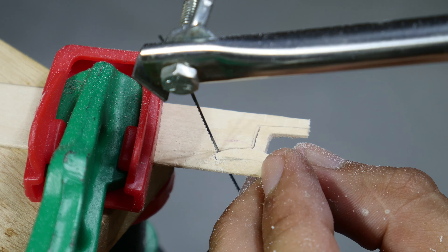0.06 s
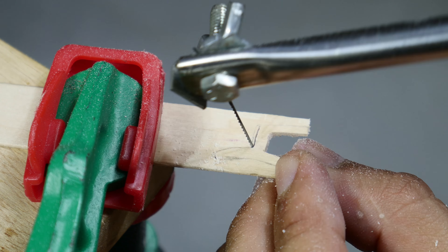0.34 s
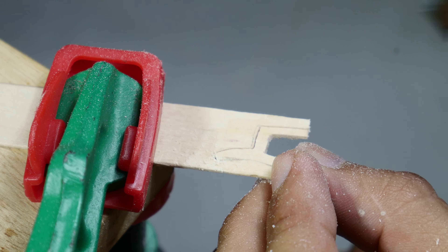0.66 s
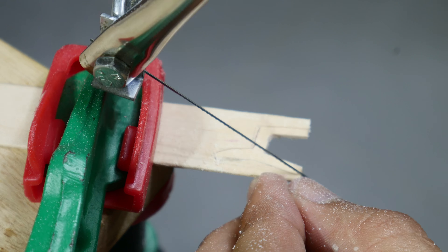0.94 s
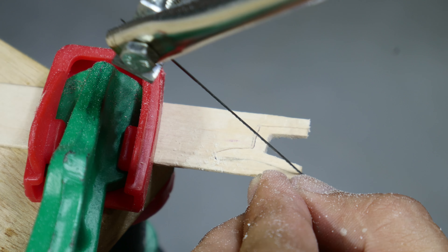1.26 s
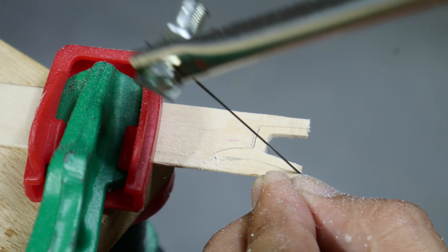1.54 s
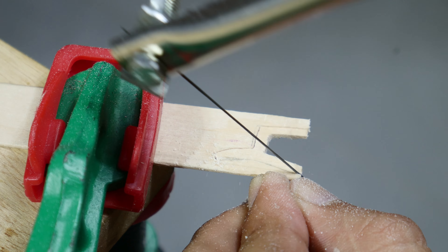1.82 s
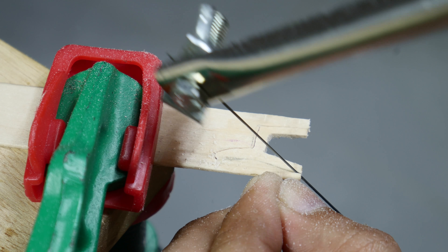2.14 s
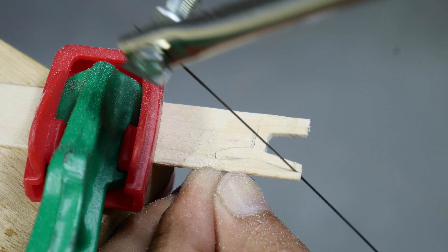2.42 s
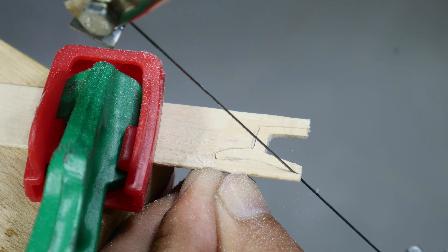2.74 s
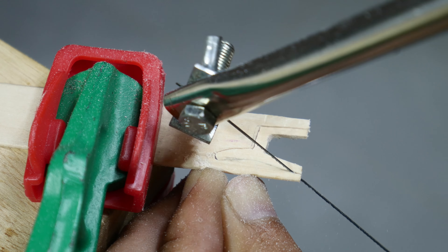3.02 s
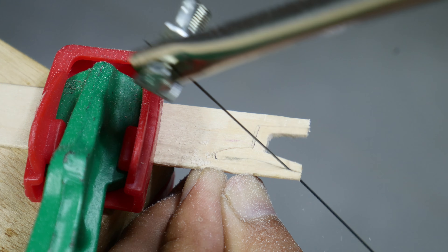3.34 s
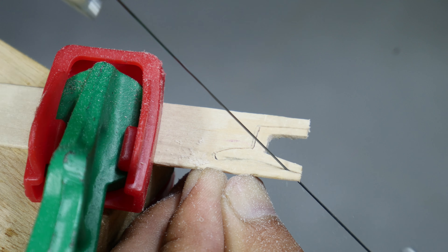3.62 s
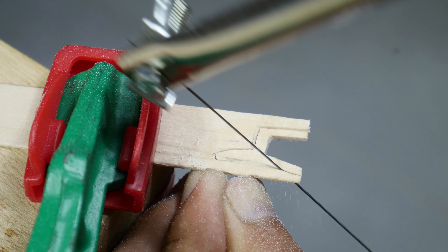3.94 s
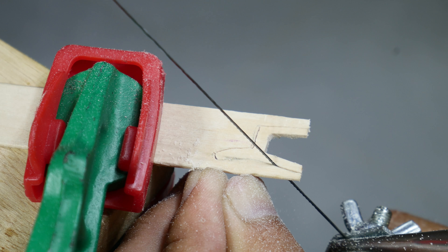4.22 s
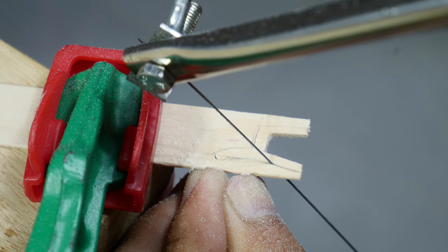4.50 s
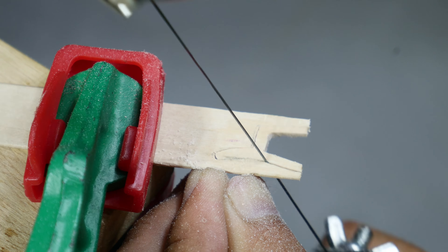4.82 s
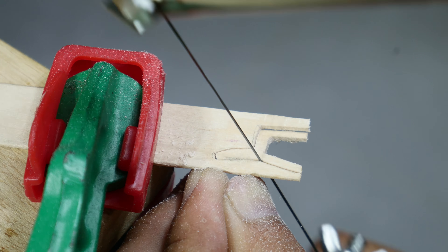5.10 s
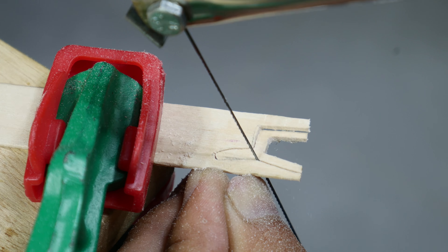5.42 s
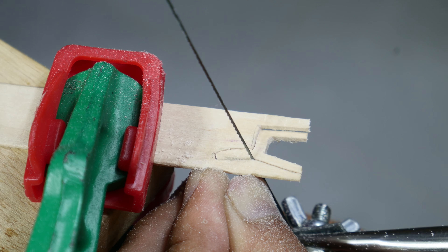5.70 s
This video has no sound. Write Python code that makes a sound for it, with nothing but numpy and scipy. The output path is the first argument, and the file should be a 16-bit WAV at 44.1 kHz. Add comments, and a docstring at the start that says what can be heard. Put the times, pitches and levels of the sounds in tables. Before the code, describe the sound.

A thin fret saw blade brushes a clamped wooden stick with a few brief scrapes and tiny, high metallic pings. After a short pause it starts sawing in quick, short strokes, a bright rasp that grows louder and keeps going. Some return strokes squeal, and the clamp and bench shudder faintly underneath. The sound is close, in a small, quiet room.

```python
"""A fret saw cutting a thin stick

The stick is clamped to a bench, close by in a small room. The blade scrapes and pings as it is worked
out of its old kerf (the slot a saw cuts), then saws from the edge in quick, short strokes. In each
stroke the teeth speed up and slow down, plucking stick and blade so that both ring. Some return
strokes squeal, the clamp shudders, and near the end the saw turns."""
import sys
import numpy as np
from scipy import signal
from scipy.fft import rfft, irfft, next_fast_len
from scipy.io import wavfile
from scipy.ndimage import uniform_filter1d, map_coordinates

SR = 44100
rng = np.random.default_rng(int(sys.argv[2]) if len(sys.argv) > 2 else 0)


def wav_record(signal):
    """Record a signal, one row per channel, as 16-bit PCM in the file named by sys.argv[1]."""
    frames = np.transpose(np.atleast_2d(signal))
    bounded = np.clip(frames, -1, 1)
    # unit amplitude maps onto the largest positive 16-bit level
    quanta = np.round(bounded * 32767).astype(np.int16)
    wavfile.write(sys.argv[1], SR, quanta)


N = 258426

# Background noise of the room: pitch_hz, level_db
AIR_COLOUR = [(25, -46), (165, -30), (240, -4.5), (360, -16.5), (450, -7.5), (2500, -13), (15800, -35)]
# Faint tones in the room: pitch_hz, level_db
HUM_TONES = [(366, -71.5), (2589, -86)]
# Low shudder of clamp and bench: time_s, level_db
SHUDDER_LEVELS = [(0, -54), (.09, -75), (2.0, -76.5), (2.15, -58.5), (2.32, -61.5), (2.55, -75), (4.6, -68),
                  (5.05, -53.5), (5.25, -64.5), (5.86, -59)]
# Colour of that shudder: pitch_hz, level_db
SHUDDER_COLOUR = [(20, -14.5), (90, -27), (170, -28), (290, -10.5), (362, 3.5), (410, -10.5), (650, -13),
                  (1100, -24.5)]
# The saw's three bands (low knock, middle rasp, high hiss): low_hz, high_hz
BANDS = [(200, 1800), (1800, 5900), (5900, 17000)]
# The loose blade brushes the wood: start_s, length_s, rasp_db, hiss_over_rasp_db, knock_over_rasp_db
SCRAPES = [(0.009, 0.02, -46, 1, -15), (0.031, 0.023, -58, -2, -10), (0.188, 0.003, -60, 9, -20),
           (0.2049, 0.0095, -39, 0.5, -18.5), (0.38, 0.012, -38.5, -6.5, -9), (0.468, 0.035, -75, -23, 9),
           (0.551, 0.038, -56.5, -7, -16), (0.611, 0.018, -43, 5, -18.5), (0.631, 0.014, -51.5, 0, -8),
           (0.654, 0.02, -42, -6, -11.5), (0.707, 0.0096, -52, 11, -26), (0.714, 0.0033, -40.5, 2.5, -26),
           (1.056, 0.031, -68.5, -5, 1), (1.259, 0.006, -57.5, -10, -9), (1.275, 0.013, -55.5, -8, -5)]
# Colour of those scrapes: pitch_hz, level_db
SCRAPE_COLOUR = [(180, -71), (300, -28), (1010, -20), (1360, -15), (1680, -27), (2590, 15), (3610, 4),
                 (3920, 14), (5200, 7), (5940, -12.5), (7870, -12.5), (8840, -14.5), (10600, -24),
                 (13200, -9), (15800, -18)]
# The blade springs free: start_s, level_db, pitch_hz
PINGS = [(0.206, -58, 8100), (0.618, -50, 7628), (0.714, -57, 11030)]
# The tones in one ping: pitch_ratio, level_db, fade_s (time to fall 60 dB)
PING_TONES = [(.435, -3, 0.048), (0.931, -3, 0.21), (0.997, 13.5, 0.09), (1.38, -21, 0.14),
              (1.997, -18, 0.12)]
# Runs of even sawing: start_s, cycles (cut and return), limp_db (cuts are stronger and weaker in turn)
RUNS = [(1.345, 1, 0.5), (1.388, 2, -1), (1.531, 3, -1), (1.723, 10, 1), (2.349, 4, 2), (2.596, 4, 0.5),
        (2.839, 5, -0.5), (3.155, 8, 1.8), (3.646, 6, 1.7), (4.016, 11, 0), (4.69, 3, 1.5), (4.867, 2, 1),
        (5.001, 3, 0.5), (5.223, 3, 0), (5.426, 4, 1.2), (5.675, 3, 0)]
# How hard the teeth press in on the cutting strokes: time_s, rasp_db
CUT_PRESSURE = [(1.34, -61.5), (1.39, -39.5), (1.85, -42), (1.91, -49), (2.1, -29.5), (2.23, -41.5),
                (2.35, -31.5), (2.53, -31.5), (2.66, -26.9), (2.84, -33.5), (2.97, -29.5), (4.2, -30.5),
                (4.32, -36), (4.69, -29), (5.151, -28), (5.219, -35), (5.36, -25), (5.799, -28)]
# How hard they drag on the way back, more as the kerf binds: time_s, rasp_db
RETURN_PRESSURE = [(1.37, -55.5), (1.43, -40), (1.57, -36.5), (1.95, -45.5), (2.011, -34), (2.26, -45.5),
                   (2.32, -35), (2.44, -37), (2.63, -33.5), (2.75, -40), (4.23, -30.5), (4.35, -35),
                   (4.48, -27.5), (4.54, -35.5), (5.19, -27), (5.26, -36), (5.33, -29.5), (5.84, -28)]
# Colour of the cutting strokes: time_s, hiss_over_rasp_db, knock_over_rasp_db
CUT_TONE = [(1.34, -1, -1.5), (1.53, -2.5, -21.5), (1.73, -10, -11.6), (2.29, -3, -12.5), (3.28, -5.5, -15),
            (3.95, -6, -17.5), (5.08, -8, -18.5), (5.22, -10, -23.5), (5.8, -17, -24)]
# Colour of the return strokes: time_s, hiss_over_rasp_db, knock_over_rasp_db
RETURN_TONE = [(1.37, -10.5, -6.5), (1.5, -10.7, -16), (2.57, -8, -25.5), (2.75, -6.5, -19.5),
               (4.29, -12.5, -22.5), (5.04, -11.5, -9.5), (5.19, -18, -29.5), (5.33, -17, -18),
               (5.84, -16.5, -12.5)]
# The teeth snag (+) or skid (-): time_s, extra_rasp_db, extra_hiss_db, extra_knock_db
SNAGS = [(1.4, 0, 0, 2), (1.44, 2.5, 7, 7), (1.93, -4, 8, 1), (2.06, 0.5, -3.5, 3), (2.23, -2, -2, -12),
         (2.49, 1.5, 1, -3.5), (2.55, 0, -0.5, -5), (2.61, 0.5, 3.5, -2.5), (2.98, 3, -0.5, 1),
         (3.17, -0.5, 5.5, -1), (3.36, 1, 3.5, 1.5), (3.42, 2.5, 0.5, -1.5), (3.91, 1.5, -0.5, 1.5),
         (4.67, 1, -2.5, 5), (5.05, 3, 3.5, -3), (5.24, 0, 0, -6), (5.34, 0.5, 0, 3)]
# Where stick and blade ring, for each seat of the blade: pitch_hz, width_hz, edge_db, deep_db, turned_db
RESONANCES = [(793, 147, -7, -18.5, -15), (966, 45, -2, -11, -18.5), (1189, 90, -2.5, -8.5, -19),
              (1367.3, 25.4, -4, -1, -16), (2070, 272, -9.5, -15, -16.5), (2550, 77, 1, -1, -9),
              (2798, 190, -10.5, -1.5, -14), (3215, 274, -3, -3.5, -9), (3886, 61, 4, 0, 0),
              (4050, 114, -3.5, -6.5, 4), (4665, 213, -1.5, -3.5, -10), (4966, 185, -6, -30.5, -7.5),
              (5324, 167, -8, -14, -11.5), (6530, 335, -14.5, -15, -22), (7990, 440, -17.5, -14, -23),
              (8957, 184, -12, -4, -21), (10050, 720, -21.5, -14, -25.5), (11870, 520, -10.5, -8, -23),
              (13170, 330, -7.5, -2, -19), (14400, 670, -17, -7.5, -40), (14600, 500, -22, -25.5, -30)]
# Rough rate of passing teeth in mid-stroke, for each seat: edge_hz, deep_hz, turned_hz
TOOTH_HZ = [1464, 1507, 1387]
# When the blade changes its seat in the wood: sinks_in_s, turns_s
SEAT_CHANGES = [2.284, 5.114]
# The squeal of the return strokes: time_s, level_over_rasp_db, pitch_hz
SQUEAL_CURVE = [(1.499, -30, 4310), (1.8, 5, 4230), (2.302, -36, 4660), (4.18, -3, 5250),
                (4.401, -15, 5034), (4.85, 3, 5200), (5.25, 1, 4410)]
# The room's echo: pitch_hz, fade_s (time to fall 60 dB)
ECHO_FADES = [(200, 0.58), (2500, 0.092), (12000, 0.17)]

TWIST_START_S, LAST_STOP_S = 4.65, 5.868  # the hand starts to twist the saw; the sawing ends
CUT_SHARE = .52  # part of a cycle taken by the cutting stroke
CUT_PEAK, RETURN_PEAK, PUSH_WIDTH = 0.49, 0.26, 0.41  # the hand's push, in parts of a stroke
STUTTER_DB, RETURN_STUTTER_DB = 2.2, 1.0  # teeth catch in the grain; extra on the way back
SLACKENING_DB, TICK_DB = 7, 13.5  # a scrape's fall in level; its first tooth landing, over the scrape
AIR_DB, SHAKE_DB, ECHO_DB = -75, -24.5, -15  # room noise; shudder over knock; echo over saw
TOP_HZ = 15950


def amp(db):
    """Turn decibels into a gain."""
    return 10 ** (np.asarray(db) / 20)


def unit(x):
    """Scale a signal to an average power of 1."""
    return x / np.sqrt(np.mean(x ** 2) + 1e-20)


def at_pitch(points, hz):
    """Read between (pitch_hz, value) points on a log pitch scale."""
    pitches, values = np.transpose(points)
    return np.interp(np.log(hz + 1), np.log(pitches + 1), values)


def at_time(curve, time_s):
    """Read each value column of a (time_s, values...) table at the given time."""
    times, *columns = np.transpose(curve)
    return [np.interp(time_s, times, column) for column in columns]


def wobble(rate_hz):
    """A smooth curve through rate_hz random points a second."""
    points = rng.standard_normal(int(N * rate_hz / SR) + 4)
    return map_coordinates(points, [np.arange(N) * rate_hz / SR])


def filtered(x, response):
    """Scale each frequency in x by response(hz)."""
    size = next_fast_len(N + SR // 2)
    return irfft(rfft(x, size) * response(np.fft.rfftfreq(size, 1 / SR)), size)[:N]


def noise(colour):
    """Steady noise with a (pitch_hz, level_db) colour."""
    return unit(filtered(rng.standard_normal(N), lambda hz: amp(at_pitch(colour, hz))))


def ring(force, response, band, size=8192):
    """A pushed object rings on after the push; this gives one band of that sound."""
    hz = np.fft.rfftfreq(size, 1 / SR) + 1
    low_hz, high_hz = band
    gain = response(hz) / np.sqrt((1 + (low_hz / hz) ** 20) * (1 + (hz / high_hz) ** 20))
    # fold the filter in time so that nothing rings before the push
    cepstrum = irfft(np.log(gain / gain.max() + 1e-4))
    cepstrum[1:size // 2] *= 2
    cepstrum[size // 2 + 1:] = 0
    one_tap = irfft(np.exp(rfft(cepstrum)))
    return signal.oaconvolve(force, one_tap / np.linalg.norm(one_tap))[:N]


def room_air():
    """Quiet room noise with a faint hum that wavers."""
    t = np.arange(N) / SR
    hum = sum(amp(db + 2.9 * wobble(7.9)) * np.sin(2 * np.pi * hz * t + 0.66 * wobble(18))
              for hz, db in HUM_TONES)
    return amp(AIR_DB) * noise(AIR_COLOUR) + hum


def clamp_shudder(strokes, stroke_no, bite):
    """Clamp and bench shudder at their own low pitch; hard strokes shake them more."""
    base_db, = at_time(SHUDDER_LEVELS, np.arange(N) / SR)
    _, rasp_db, _, knock_db, _ = strokes.T
    shake = bite * amp((rasp_db + knock_db)[stroke_no] + SHAKE_DB)
    return (amp(base_db) * (1 + .5 * bite) + shake) * noise(SHUDDER_COLOUR)


def tearing_fibres(rate_hz, spread_db=5.0):
    """Wood fibres tear in tiny, uneven bursts of noise."""
    return unit(rng.standard_normal(N) * amp(spread_db * wobble(rate_hz)))


def blade_scrapes():
    """A few teeth land on the wood with a tick, then scrape as the pressure eases."""
    t = np.arange(N) / SR
    fibres = tearing_fibres(rate_hz=850)
    forces = np.zeros((len(BANDS), N))
    for start_s, length_s, rasp_db, hiss_db, knock_db in SCRAPES:
        touching = (t >= start_s) & (t < start_s + length_s)
        easing_db = SLACKENING_DB * (.4 - (t[touching] - start_s) / length_s)
        pressure = amp(rasp_db + easing_db + np.array([[knock_db], [0], [hiss_db]]))
        forces[:, touching] = pressure * unit(fibres[touching])
        forces[:, np.argmax(touching)] += pressure[:, 0] * amp(TICK_DB)
    colour = lambda hz: amp(at_pitch(SCRAPE_COLOUR, hz))
    return sum(ring(force, colour, band) for force, band in zip(forces, BANDS))


def blade_pings():
    """The tight blade springs free and rings; its pitch depends on where the wood last held it."""
    out, t = np.zeros(N), np.arange(SR // 2) / SR
    for start_s, ping_db, hz in PINGS:
        for ratio, tone_db, fade_s in PING_TONES:
            if hz * ratio < TOP_HZ:
                fade = amp(ping_db + tone_db - 60 * t / fade_s)
                out[round(start_s * SR):][:len(t)] += fade * np.sin(2 * np.pi * hz * ratio * t)
    return out


def plan_strokes():
    """Cuts and returns in turn: start_s, rasp_db, hiss_over_rasp_db, knock_over_rasp_db, push_peak."""
    ends = [run[0] for run in RUNS[1:]] + [LAST_STOP_S]
    rows = []
    for (first_s, cycles, limp_db), end_s in zip(RUNS, ends):
        cycle_s = (end_s - first_s) / round(cycles)
        for k in range(round(cycles)):
            cut = first_s + k * cycle_s, CUT_PRESSURE, CUT_TONE, CUT_PEAK, limp_db * (-1) ** k
            back = first_s + (k + CUT_SHARE) * cycle_s, RETURN_PRESSURE, RETURN_TONE, RETURN_PEAK, 0
            for start_s, pressure, tone, push_peak, accent_db in cut, back:
                rasp_db, = at_time(pressure, start_s)
                hiss_db, knock_db = at_time(tone, start_s)
                rows.append((start_s, rasp_db + accent_db, hiss_db, knock_db + accent_db, push_peak))
    strokes = np.array(rows)
    for time_s, *extra_db in SNAGS:
        strokes[np.searchsorted(strokes[:, 0], time_s) - 1, 1:4] += extra_db
    column_spread = [0, .5, .6, 1.9, .05]  # no two strokes are alike
    return strokes + column_spread * rng.standard_normal(strokes.shape)


def blade_motion(strokes):
    """For each sample: the stroke under way, the blade's speed (0-1) and how hard the teeth bite."""
    t = np.arange(N) / SR
    turns_s = np.append(strokes[:, 0], LAST_STOP_S)
    started = t > turns_s[0]
    strokes_done = np.interp(t, turns_s, np.arange(len(turns_s)))
    stroke_no = np.minimum(strokes_done.astype(int), len(strokes) - 1)
    progress = strokes_done - stroke_no
    speed = np.abs(np.sin(np.pi * progress))  # the blade stands still at each end
    push_peak = strokes[stroke_no, 4]
    push = np.exp(-((progress - push_peak) / PUSH_WIDTH) ** 2)
    bite = speed ** 0.55 * (push + 0.24) + 0.013  # a little bite is left without push or speed
    # early in a stroke the teeth stick for a moment, then break free at once
    bite *= np.where(progress > .45 * push_peak, 1, 0.55) * started
    bite *= amp((STUTTER_DB + RETURN_STUTTER_DB * (stroke_no % 2)) * wobble(230))
    stroke_power = np.bincount(stroke_no, bite ** 2) / np.bincount(stroke_no, started)
    return stroke_no, speed, bite / np.sqrt(stroke_power[stroke_no])


def blade_seats(start_s):
    """How the blade sits in each stroke: 0 on an edge, 1 deep in the kerf, 2 turned."""
    seats = np.searchsorted(SEAT_CHANGES, start_s + .01)
    returning = np.arange(len(start_s)) % 2 == 1
    # once the saw twists, the light return strokes ride up on the edge of the kerf
    return np.where(returning & (start_s > TWIST_START_S) & (seats == 1), 0, seats)


def stick_and_blade(hz, seat):
    """How strongly stick and blade ring at each pitch, for one seat of the blade."""
    resonances = np.array(RESONANCES)
    pitch_hz, width_hz = resonances[:, :1], resonances[:, 1:2]
    peaks = (1 + ((hz - pitch_hz) / width_hz) ** 2) ** -2
    return np.sqrt(amp(resonances[:, 2 + seat]) ** 2 @ peaks)


def tooth_pulses(rate_hz, timing_spread=.02, spread_db=1.4, count=16000):
    """One pulse for each tooth that meets the wood, a little uneven in time and size."""
    chance = rng.standard_normal((count, 2))
    teeth_passed = np.cumsum(rate_hz) / SR
    hits = np.interp(np.arange(count) + timing_spread * chance[:, 0], teeth_passed, np.arange(N))
    inside = (hits > 8) & (hits < N - 9)
    hits, sizes = hits[inside, None], amp(spread_db * chance[inside, 1:])
    nearby = hits.astype(int) + np.arange(-7, 9)  # a hit between samples is shared among its neighbours
    pulses = np.bincount(nearby.ravel(), (sizes * np.sinc(nearby - hits)).ravel(), N)
    return unit(pulses / np.sqrt(rate_hz))


def shimmer(x, depth_db, size=256):
    """As the contact slides along the blade, narrow bands of its ring swell and fade."""
    hz, _, spectrum = signal.stft(x, SR, nperseg=size)
    swell = uniform_filter1d(rng.standard_normal(spectrum.shape), size=4, axis=0)  # smooth over pitch
    swell = unit(uniform_filter1d(swell, size=3, axis=1))  # and over time
    spread_db = depth_db * np.minimum(hz / 8000, 1)[:, None] ** .7
    gain = amp(spread_db * swell)
    gain /= np.sqrt(np.mean(gain ** 2, axis=1, keepdims=True))
    return signal.istft(spectrum * gain, nperseg=size)[1][:N]


def sawing(strokes, stroke_no, speed, bite):
    """Teeth and tearing fibres set stick and blade ringing: a low knock, a rasp and a hiss."""
    start_s, rasp_db, hiss_db, knock_db, _ = strokes.T
    seats = blade_seats(start_s)
    mid_stroke_hz = np.array(TOOTH_HZ)[seats] * np.exp(.05 * rng.standard_normal(len(start_s)))
    # the tooth rate rises and falls with the blade's speed, and stumbles in the grain
    stumble = np.exp(.04 * wobble(130) + .025 * wobble(650))
    pulses = tooth_pulses(mid_stroke_hz[stroke_no] * (speed ** .5 + .02) * stumble)
    # hard, hissy strokes tear the wood; light ones glide over it and squeak
    tearing = np.interp(hiss_db, [-12, -3], [.2, .5])[stroke_no]
    band_levels_db = [rasp_db + knock_db, rasp_db, rasp_db + hiss_db]
    out = np.zeros(N)
    for band, level_db, roughness in zip(BANDS, band_levels_db, [1.5, 1, .7]):
        torn_share = roughness * tearing
        force = np.sqrt(1 - torn_share) * pulses + np.sqrt(torn_share) * tearing_fibres(rate_hz=1800)
        force *= bite * amp(level_db[stroke_no])
        for seat in np.unique(seats):
            out += ring(force * (seats[stroke_no] == seat), lambda hz: stick_and_blade(hz, seat), band)
    return shimmer(out, depth_db=5.0)


def blade_squeal(strokes, stroke_no, speed, bite):
    """Going back, the blade's side sticks and slips on the kerf wall: a shaky tone that rises and falls."""
    over_rasp_db, pitch_hz = at_time(SQUEAL_CURVE, np.arange(N) / SR)
    waver = np.exp(.035 * wobble(150) + .025 * wobble(900))
    hz = pitch_hz * speed ** .13 * waver
    level_db = strokes[stroke_no, 1] + over_rasp_db + 4.1 * wobble(92)
    returning = stroke_no % 2
    return returning * bite * speed * amp(level_db) * np.sin(2 * np.pi * np.cumsum(hz) / SR)


def room_echo(x, delay_s=0.003):
    """The walls answer with a short echo in which the bass lasts longest."""
    hz, t, spectrum = signal.stft(rng.standard_normal(SR // 2), SR, nperseg=256)
    fade = amp(-60 * t / at_pitch(ECHO_FADES, hz)[:, None])
    tail = signal.istft(spectrum * fade, SR, nperseg=256)[1]
    tail = np.pad(tail, (round(delay_s * SR), 0))
    return signal.fftconvolve(x, tail / np.linalg.norm(tail))[:N]


def scene():
    """Mix the saw, its echo, the clamp and the room noise into one channel."""
    strokes = plan_strokes()
    stroke_no, speed, bite = blade_motion(strokes)
    saw = sawing(strokes, stroke_no, speed, bite) + blade_squeal(strokes, stroke_no, speed, bite)
    saw += blade_scrapes() + blade_pings()
    echo = amp(ECHO_DB) * room_echo(saw)
    return (saw + echo + clamp_shudder(strokes, stroke_no, bite) + room_air())[None]


def record(dry):
    """Remove the treble above TOP_HZ."""
    return np.array([filtered(channel, lambda hz: hz < TOP_HZ) for channel in dry])


dry = scene()
out = record(dry)
wav_record(out)
```